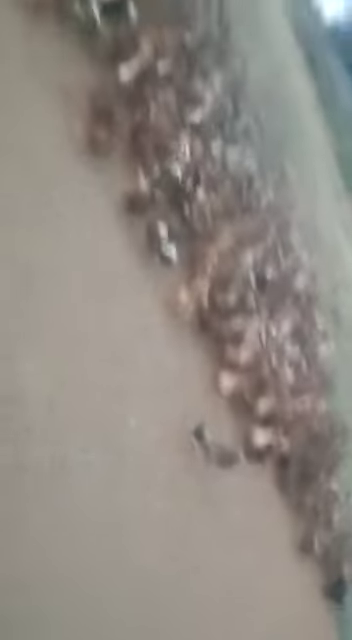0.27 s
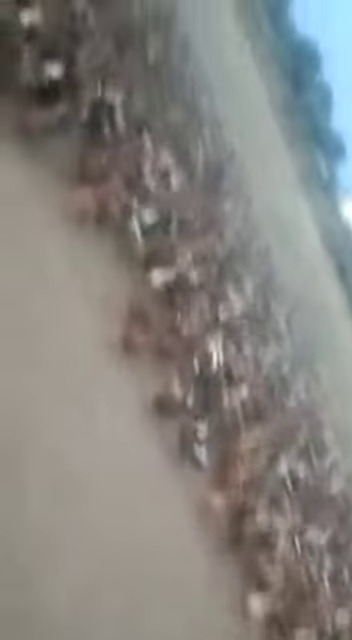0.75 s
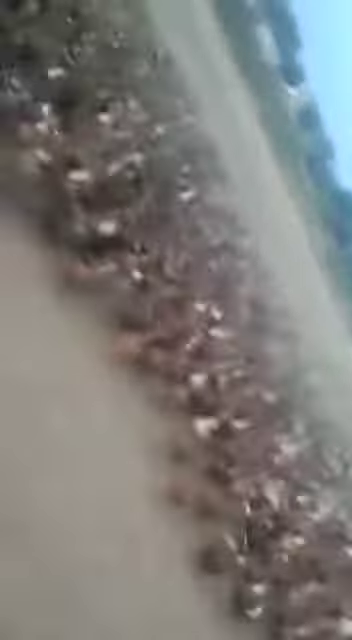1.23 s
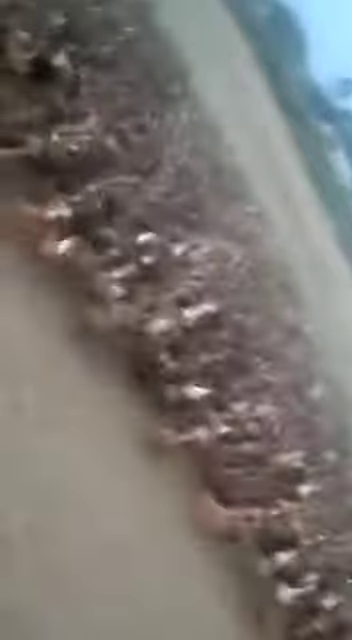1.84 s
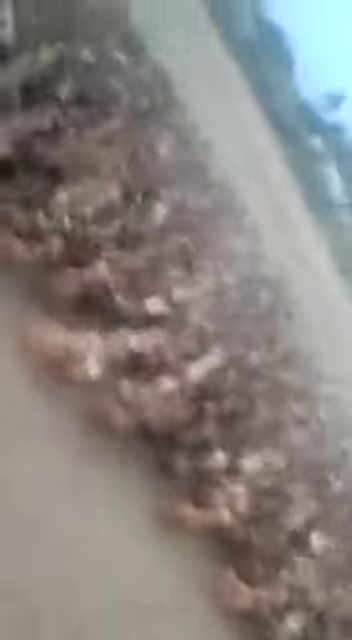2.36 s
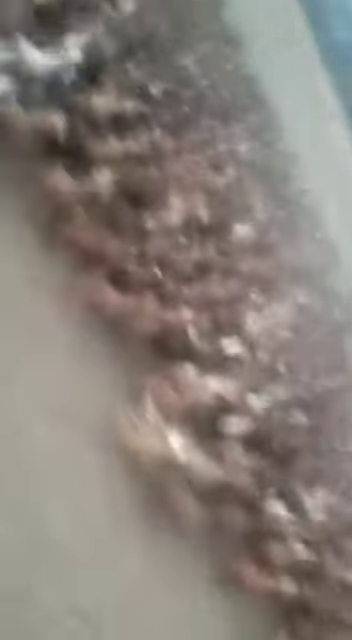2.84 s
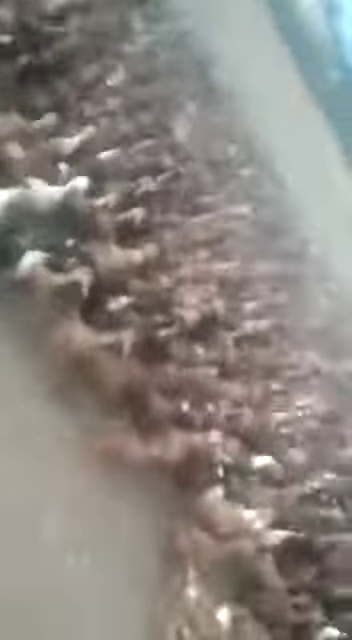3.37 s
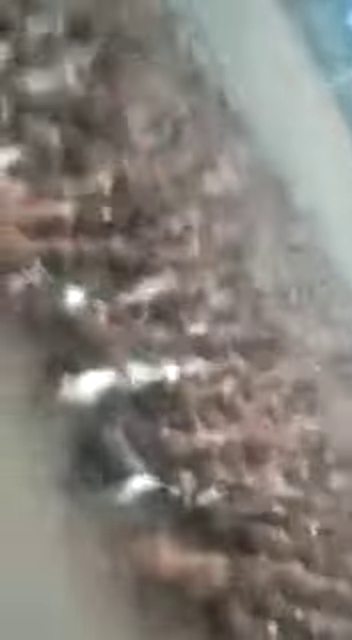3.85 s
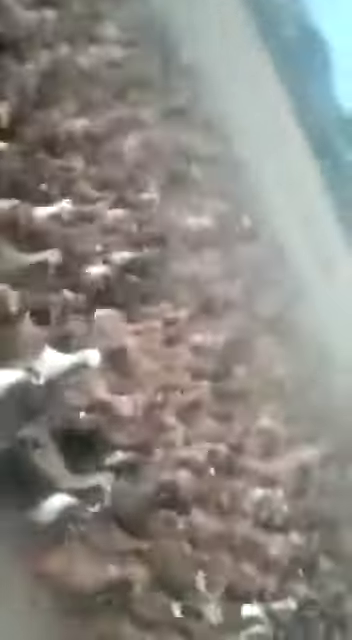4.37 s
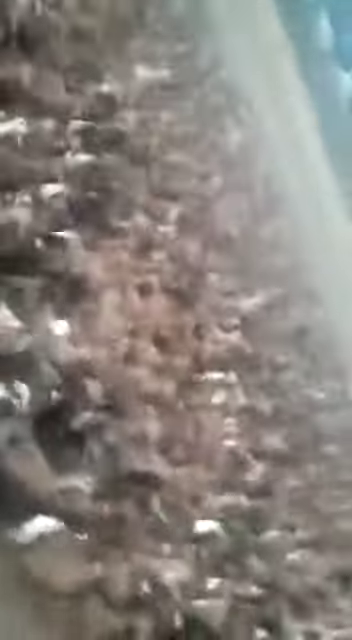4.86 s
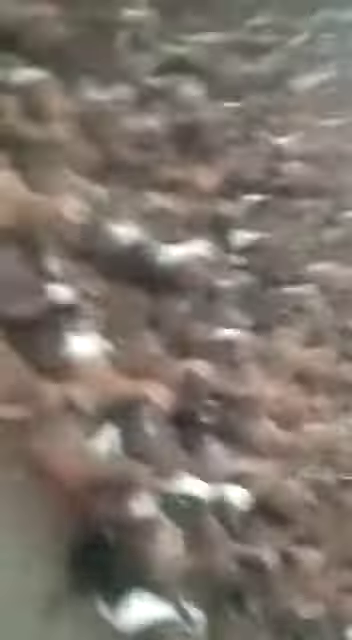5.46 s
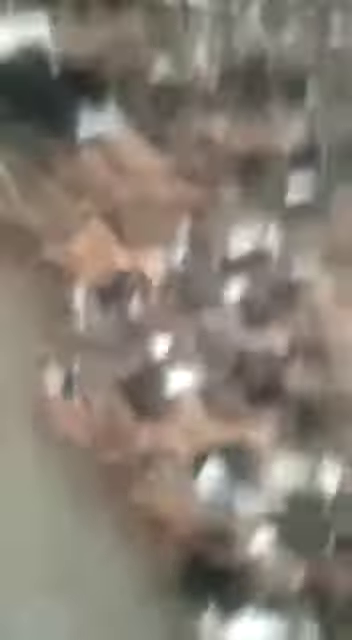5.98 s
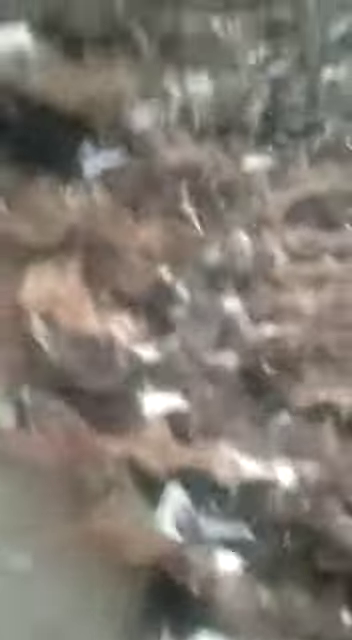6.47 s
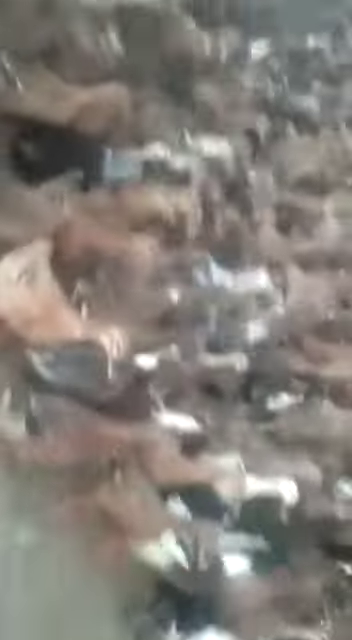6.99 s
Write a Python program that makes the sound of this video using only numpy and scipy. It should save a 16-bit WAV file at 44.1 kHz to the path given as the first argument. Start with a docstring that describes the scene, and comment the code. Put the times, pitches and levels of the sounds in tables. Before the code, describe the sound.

Hundreds of ducks chatter nonstop beside water outdoors, nearer birds quacking harshly over the din while low gusts buffet a handheld phone.

```python
"""Duck flock on a windy farm pond

A huge flock of ducks crowds along a pond, all quacking at once, heard from a hand-held phone outdoors.
Each quack is a rough train of pulses and air puffs ringing one bird's throat, with a short diffuse tail.
Near birds stand out of a levelled chorus; a delayed copy off the water hollows the low middle.
Wind is shaped noise that rumbles at the microphone, and short pressure pulses thump on it.
"""
import sys
import numpy as np
from scipy import signal
from scipy.fft import rfft, irfft
from scipy.io import wavfile
from scipy.ndimage import uniform_filter1d, map_coordinates

SR = 44100
rng = np.random.default_rng(int(sys.argv[2]) if len(sys.argv) > 2 else 0)


def dump(signal):
    """Clip the signal to [-1, 1] and save it as 16-bit WAV at the path in sys.argv[1]."""
    limited = np.clip(np.atleast_2d(signal).T, -1, 1)
    pcm = np.round(limited * 32767).astype(np.int16)
    wavfile.write(sys.argv[1], SR, pcm)


N = 318843
FREQS = np.arange(513) * SR / 1024 + 1  # Hz, kept above zero for ratios and logs


def undb(db):
    """Decibels to gain."""
    return 10 ** (np.asarray(db) / 20)


def unit(x):
    """Scale to rms 1."""
    return x / np.sqrt(np.mean(x ** 2) + 1e-18)


def curve(table, t):
    """Read each value column of a table over time at times t."""
    s, *columns = np.transpose(table)
    return [np.interp(t, s, column) for column in columns]


def add(out, s, x):
    """Mix x into out from time s on, trimming what falls outside."""
    i = int(s * SR)
    a, b = max(i, 0), min(i + len(x), len(out))
    if b > a:
        out[a:b] += x[a - i:b - i]


def butter(x, hz, kind, order):
    """Butterworth low-pass or high-pass."""
    return signal.sosfilt(signal.butter(order, hz, kind, fs=SR, output="sos"), x)


def walk(rate):
    """Smooth random wander with a spread near 1, redrawn rate times a second."""
    hold = int(SR / rate)
    steps = np.repeat(rng.standard_normal(N // hold + 1), hold)
    return unit(uniform_filter1d(steps, hold)[:N])


# Resonances of a duck's chest, throat and bill, before each bird's variation:
# (frequency [Hz], width [Hz], level [dB])
THROAT_RESONANCES = [(212.6, 144, -12.5), (1026, 950, -16.5), (1532, 360, -1.5), (1919, 453, 0),
                     (2477, 380, -9), (3540, 2830, -17.5), (4690, 1600, -16.5), (5510, 1450, -20.5),
                     (6910, 2900, -25)]


def throat(size_spread, colour_db, lift_db):
    """Impulse response of one bird: resonances shifted by its size, recoloured and lifted by lift_db."""
    hz, width, db = np.transpose(THROAT_RESONANCES)
    shift, colour = rng.standard_normal((2, len(hz)))
    ratio = FREQS[:, None] / (hz * np.exp(size_spread * shift))
    detune = (ratio - 1 / ratio) * hz / width
    peaks = undb(db + colour_db * colour) ** 2 / (1 + detune ** 2) ** 2
    spectrum = unit(np.sqrt(peaks.sum(axis=1))) * undb(lift_db)
    # folding the cepstrum makes the response causal: a sharp start, then ringing
    cepstrum = irfft(np.log(spectrum + 1e-6))
    cepstrum[1:len(FREQS) - 1] *= 2
    cepstrum[len(FREQS):] = 0
    return irfft(np.exp(rfft(cepstrum)))


def scatter(voice, wet_db, t60, size=2048):
    """Water, bank and bodies give each bird's sound a short diffuse tail, falling 60 dB in t60 seconds."""
    t = np.arange(size) / SR
    tail = rng.standard_normal(size) * np.exp(-np.log(1000) * t / t60)
    tail *= undb(wet_db) / np.linalg.norm(tail)
    tail[0] = 1  # direct sound
    return signal.fftconvolve(voice, tail / np.linalg.norm(tail))


def quack(length, pitch_hz, voice, jitter, rasp, shimmer_db=2, arch=.2, gape=0.06147, puff=0.3, count=96):
    """The syrinx slaps shut in uneven beats, each with a puff of air; pitch and level arch."""
    u = np.linspace(0, 1, int(length * SR))
    swell = np.sin(np.pi * u ** .8).clip(0)
    stretch, beat = rng.standard_normal((2, count))
    # pitch_hz is reached at the top of the arch; jitter then makes the beats uneven in length
    phase = np.cumsum(pitch_hz * (1 + arch * (swell - 1))) / SR
    beat_ends = np.cumsum(np.exp(jitter * stretch)) - 1
    phase = np.interp(phase, beat_ends, np.arange(count))
    cycle = phase.astype(int)
    slaps = np.diff(cycle, prepend=0)
    air = np.exp(-(phase % 1) / puff) * rng.standard_normal(len(u))
    strength = undb(shimmer_db * beat)[cycle]
    source = unit((unit(slaps) + rasp * unit(air)) * strength * swell)
    call = signal.fftconvolve(source, voice)
    # the bill opens and closes: playing the call at a varying speed bends all resonances up and back
    opening = np.pad(swell, (0, len(voice) - 1)) - np.average(swell, weights=swell ** 2)
    return map_coordinates(call, [np.cumsum(1 + gape * opening)], order=2)


# How loud and bright the flock's din is over time, before the chorus gain:
# (time [s], main quack band level [dB], treble level [dB])
CHORUS_LEVELS = [(0.0, -24.5, -40), (0.32, -22, -39), (1.05, -19, -30.5), (1.43, -21, -34.5),
                 (2.33, -22.5, -32.5), (3.58, -20, -27), (4.17, -19.5, -26), (4.37, -21.5, -28.5),
                 (5.13, -22, -32.5), (6.24, -18, -33.5), (6.68, -18, -30), (7.23, -19, -30)]


def chorus(pitch_hz=215, pitch_spread=.22, length=.095, repeat_s=.24, size_spread=0.037, colour_db=2.5,
           range_db=12, wet_db=-2, t60=0.071, beam_hz=2300, facing_db=7.5, treble_octaves=0.94, count=210):
    """Birds all over the flock quack in bouts of three, with each bird's level drawn at random."""
    out = np.zeros(N)
    # the higher the sound, the more it matters which way the birds face
    beam = (np.log2(FREQS / beam_hz) / treble_octaves).clip(0, 1)
    for middle in np.linspace(-repeat_s, N / SR + repeat_s, count):
        pitch, pace = rng.standard_normal(2)
        main_db, treble_db = curve(CHORUS_LEVELS, middle)
        lift_db = beam * (treble_db - main_db + facing_db)
        voice = scatter(throat(size_spread, colour_db, lift_db), wet_db, t60)
        gain = undb(-range_db * rng.random())
        bird_length, bird_hz = length * np.exp(.2 * pace), pitch_hz * np.exp(pitch_spread * pitch)
        for k, late in enumerate(rng.random(size=3)):
            call = quack(bird_length, bird_hz, voice, jitter=.045, rasp=0.655)
            add(out, middle + repeat_s * (k - 1) - late * length / 2, gain * call)
    # so many birds keep the din even from moment to moment
    din = np.sqrt(uniform_filter1d(out ** 2, size=SR // 16) + 1e-9)
    return out / din * undb(curve(CHORUS_LEVELS, np.arange(N) / SR)[0])


# Where the reflection off the water cancels the direct sound, falling as the birds come closer:
# (time [s], dip frequency [Hz])
WATER_DIP = [(0, 740), (1.3, 610), (2.3, 580), (4.2, 437), (7.2, 340)]


def pond(x, reflect=0.43, blur_hz=900):
    """The water returns the calls half a period of the dip later; in the treble the many paths blur out."""
    dip_hz, = curve(WATER_DIP, np.arange(N) / SR)
    # filtering forwards and backwards adds no delay
    lows = butter(x, blur_hz, "low", order=3)
    lows = butter(lows[::-1], blur_hz, "low", order=3)[::-1]
    delay = SR / dip_hz / 2  # samples
    return x + reflect * np.interp(np.arange(N) - delay, np.arange(N), lows)


# Light air that never stops on the microphone, before flutter and gust colour: (time [s], level [dB])
BREEZE = [(0.0, -23.5), (1.46, -31.5), (1.81, -39), (3.71, -46.5), (5.51, -31), (5.69, -34.5), (6.9, -35.5)]
# Gusts on top of it, likewise: (start [s], length before release [s], level [dB])
GUSTS = [(0.043, 0.34, -32), (.41, 0.43, -25), (1.133, 0.19, -27.5), (1.41, 0.13, -25.5),
         (2.13, .04, -31.5), (2.256, 0.17, -28), (2.466, 0.078, -32.5), (3.065, 0.17, -32),
         (3.73, 0.12, -32), (4.345, 0.037, -31), (4.455, 0.032, -27), (4.533, 0.041, -29),
         (4.87, 0.065, -31.5), (5.01, 0.23, -31), (5.227, 0.37, -30.5), (5.62, 0.13, -31),
         (5.875, 0.21, -33), (6.166, 0.041, -25.5), (6.365, 0.094, -25), (6.615, 0.046, -28),
         (6.9, 0.174, -30), (7.036, .25, -20.5)]


def wind_level(attack_s=0.025, release_s=0.055):
    """Strength of the wind in dB: each gust rises quickly, holds and dies away into the breeze."""
    t = np.arange(N) / SR
    power = undb(curve(BREEZE, t)[0]) ** 2
    for s, length, db in GUSTS:
        rise = ((t - s) / attack_s).clip(0, 1)
        fall = np.exp(-((t - s - length) / release_s).clip(0, 20))
        power += (undb(db) * rise * fall) ** 2
    return 10 * np.log10(power)


# Spectrum of the rumble in a moderate gust: (frequency [Hz], relative level [dB])
RUMBLE_SPECTRUM = [(20, -32), (42, -17), (70, 0), (125, 1.5), (220, -3.5), (350, -12.5), (600, -23.5),
                   (1500, -36.5)]


def wind(flutter_db=2.32, eddy_hz=270, moderate_db=-28.5, sharpen=1.38):
    """Turbulence on the microphone port; stronger gusts shed smaller, higher eddies."""
    db = wind_level()
    hz, shape_db = np.transpose(RUMBLE_SPECTRUM)
    f = np.arange(N // 2 + 1) * SR / N + 1
    shape = undb(np.interp(np.log(f), np.log(hz), shape_db)) / (1 + (f / hz[-1]) ** 2)
    air = rfft(rng.standard_normal(N)) * shape
    whole = irfft(air, N)
    small = irfft(air * f ** 2 / (f ** 2 + eddy_hz ** 2), N)  # the higher eddies alone
    small_gain = undb(sharpen * (db - moderate_db)) - 1  # negative below a moderate gust
    rumble = (whole + small_gain * small) / whole.std()
    return rumble * undb(db + flutter_db * walk(45))


# Single buffets of air, levels before the high-pass: (time [s], peak level [dB])
BUFFETS = [(.118, -17), (.53, -18), (0.786, -6), (1.093, -13), (1.479, -7), (4.585, -11), (4.886, -9.5),
           (4.944, -10), (5.105, -13), (5.253, -12), (5.408, -10), (5.53, -13), (6.199, -10.5), (6.423, -6),
           (6.681, -9)]


def buffets(width_s=0.0012):
    """A lone eddy strikes the port: a sharp push between two shallow pulls."""
    out = np.zeros(N)
    t = np.arange(-SR // 50, SR // 50) / SR
    for s, db in BUFFETS:
        u = t / (2 * width_s * np.exp(0.19 * rng.standard_normal()))
        push = (1 - u ** 2) / (1 + u ** 2) ** 4
        add(out, s + t[0], undb(db) * push)
    return butter(out, 82, "high", order=2)


# Near birds quacking in evenly paced bouts; pitch is a centre for random spread, levels are relative:
# (first quack [s], last quack [s], quacks [count], length [s], pitch [Hz], level [dB],
#  fade per quack [dB], bill brightness [dB])
BOUTS = [(0.838, 1.35, 3, 0.1105, 125.3, -27.5, 4, -4.5), (1.5, 2.57, 6, 0.088, 126.8, -25.5, 0.1, -3.5),
         (3.37, 3.878, 3, .14, 120, -29.5, -3, 6), (3.21, 3.43, 2, 0.082, 162.2, -25.5, 2, -4),
         (3.94, 4.238, 2, 0.12, 169.8, -27.5, -2.5, 6.5), (4.515, 5.276, 4, .08, 174.1, -19.5, 1.5, -3.5),
         (4.694, 5.096, 3, 0.076, 203.6, -23, 1, -8), (5.438, 6.129, 4, .13, 200, -27, -0.5, 4.5),
         (5.735, 7.042, 7, 0.12, 120.4, -24.5, 1.4, 6), (6.459, 6.981, 3, .12, 215.4, -25, 2, 4.5)]
# Lone quacks close by, likewise:
# (start [s], length [s], pitch [Hz], level [dB], bill brightness [dB])
LONE_QUACKS = [(.92, 0.091, 131, -31, -21), (1.71, .11, 132.4, -24.5, -11), (2.88, 0.092, 111, -29, 3),
               (3.125, 0.068, 121.9, -22.5, 3), (3.55, 0.095, 235.5, -27, 7.5), (4.13, 0.113, 164, -27, 2),
               (4.375, 0.0743, 113, -20, -26), (5.16, .13, 150, -21.5, -3.5),
               (5.51, 0.16, 211.6, -23.5, 1.5), (5.71, 0.0874, 145, -24, -10), (5.91, 0.078, 198, -28, 7),
               (6.02, .12, 124.2, -23, 0), (6.6, .08, 158, -25.5, 2), (6.29, 0.1, 135.3, -23.5, -7),
               (6.78, 0.18, 119, -24.5, -1)]


def near_quacks():
    """List every close quack; within a bout the pace is even and the level steps down or up."""
    quacks = list(LONE_QUACKS)
    for first, last, count, length, pitch_hz, db, fade_db, bright_db in BOUTS:
        for k, s in enumerate(np.linspace(first, last, round(count))):
            quacks.append((s, length, pitch_hz, db - k * fade_db, bright_db))
    return quacks


def near_ducks(size_spread=0.039, colour_db=0.5, gain_db=1, wet_db=-1, t60=0.05, bill_hz=4800,
               bill_octaves=0.565, pitch_spread=.06, top_hz=7500, top_db_per_octave=-6):
    """The closest birds: a wide-open bill rings in the treble, and the voice dies away above it."""
    out = np.zeros(N)
    bill = np.exp(-(np.log2(FREQS / bill_hz) / bill_octaves) ** 2)
    top_db = top_db_per_octave * np.log2(FREQS / top_hz).clip(0)
    for s, length, pitch_hz, db, bright_db in near_quacks():
        voice = scatter(throat(size_spread, colour_db, bright_db * bill + top_db), wet_db, t60)
        bird_hz = pitch_hz * np.exp(pitch_spread * rng.standard_normal())
        # a more regular rattle than in the chorus
        call = quack(length, bird_hz, voice, jitter=.04, rasp=0.687, shimmer_db=1.7)
        add(out, s, undb(db + gain_db) * call)
    return out


def scene(chorus_db=0.45):
    """The flock by the water, with wind at the microphone."""
    ducks = undb(chorus_db) * chorus() + near_ducks()
    return (pond(ducks) + wind() + buffets())[None]


def record(dry, edge_hz=8800, leak_db=-11, ceiling=0.65, top_hz=15450):
    """The phone rounds the highest peaks; its top octave falls away to a low shelf and is then cut."""
    x = ceiling * np.tanh(dry / ceiling)
    body = butter(x, edge_hz, "low", order=9)
    shelf = undb(leak_db) * butter(x, edge_hz, "high", order=9)
    cut = signal.ellip(8, .2, 70, top_hz, fs=SR, output="sos")  # 0.2 dB ripple, 70 dB rejection
    return signal.sosfilt(cut, body + shelf)


dry = scene()
out = record(dry)
dump(out)
```